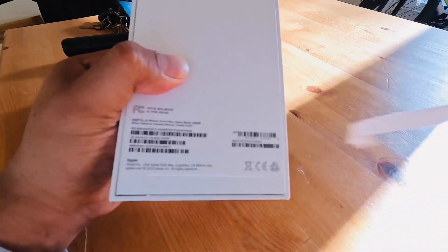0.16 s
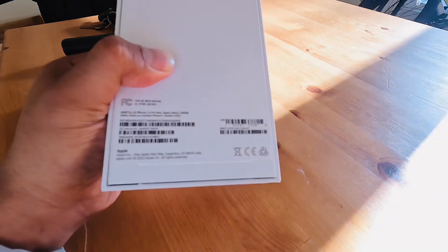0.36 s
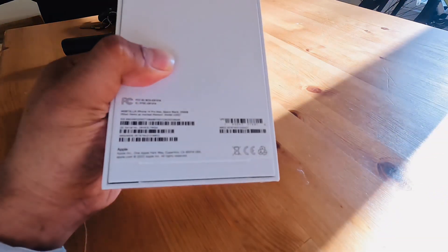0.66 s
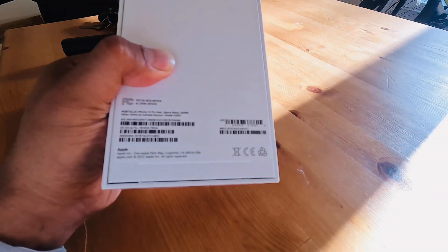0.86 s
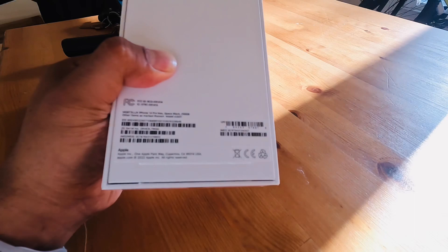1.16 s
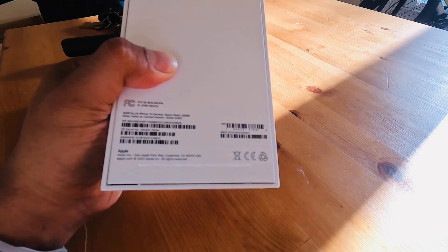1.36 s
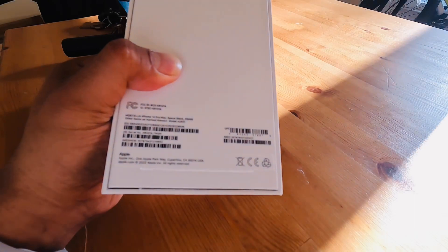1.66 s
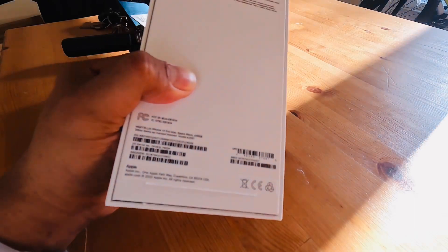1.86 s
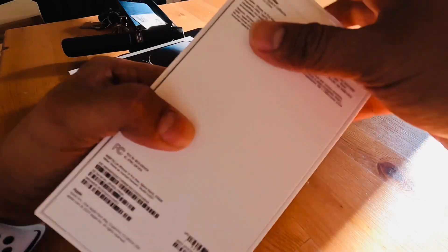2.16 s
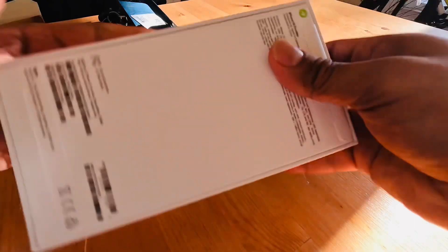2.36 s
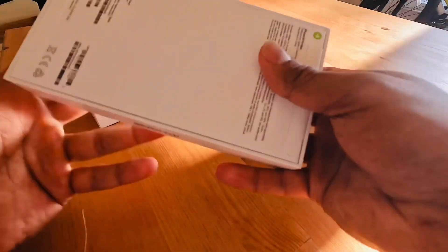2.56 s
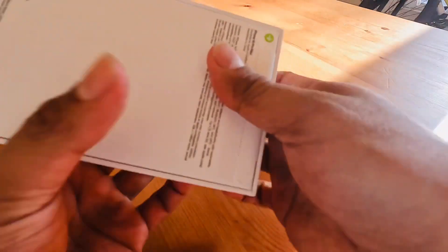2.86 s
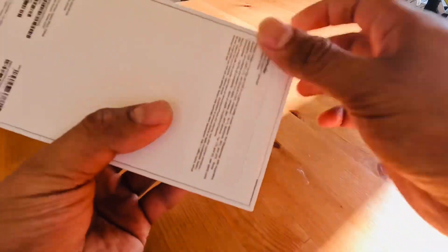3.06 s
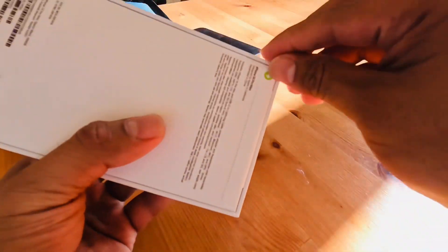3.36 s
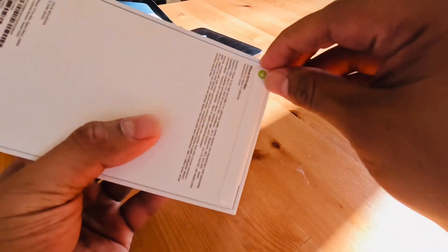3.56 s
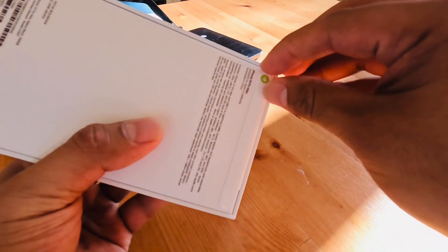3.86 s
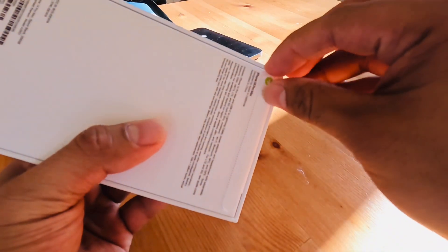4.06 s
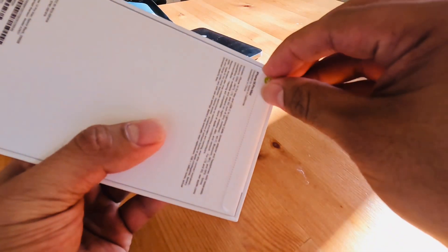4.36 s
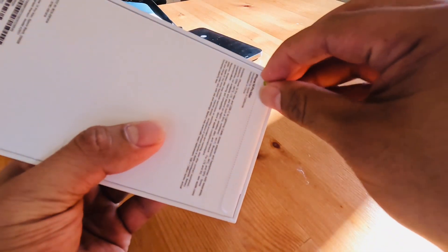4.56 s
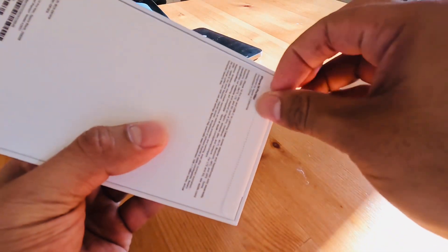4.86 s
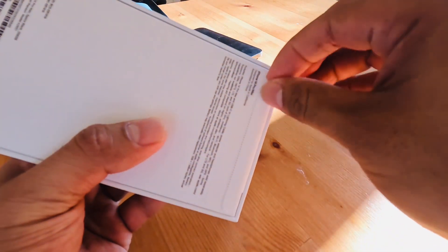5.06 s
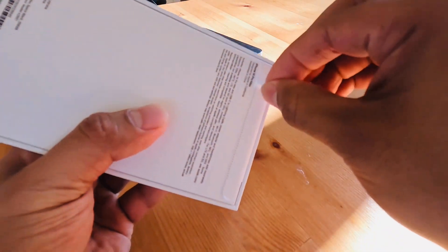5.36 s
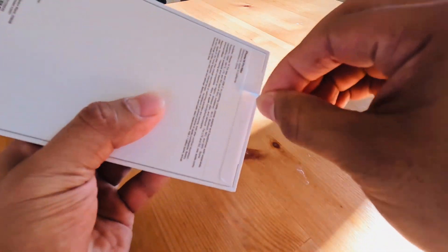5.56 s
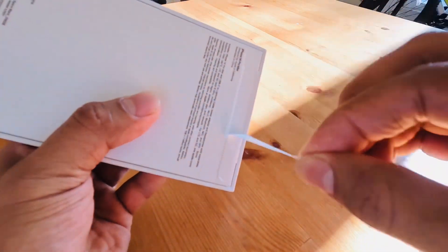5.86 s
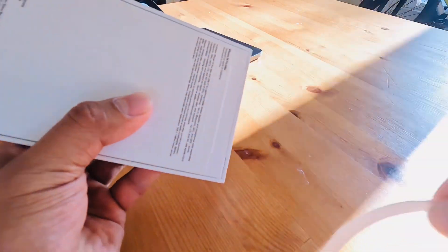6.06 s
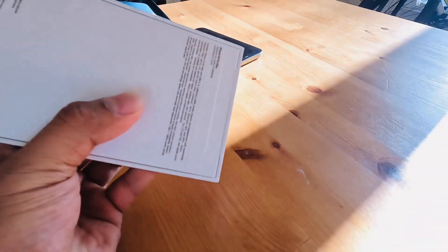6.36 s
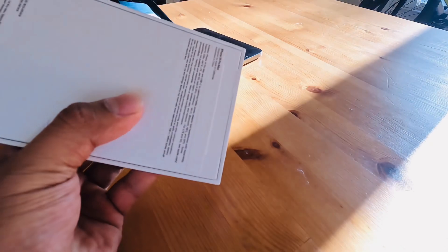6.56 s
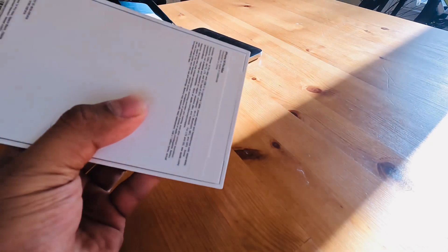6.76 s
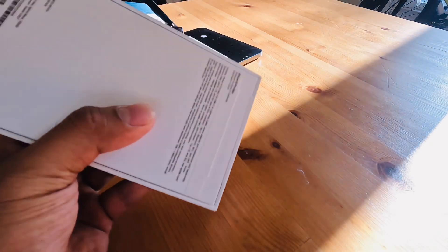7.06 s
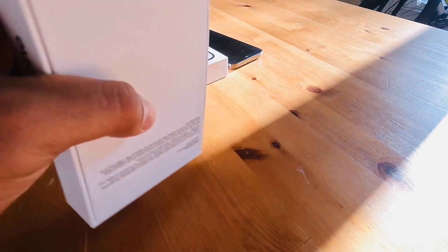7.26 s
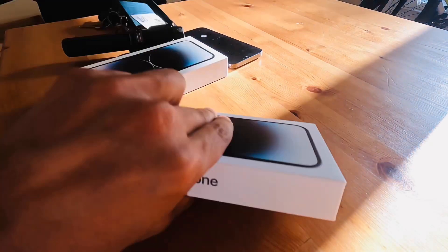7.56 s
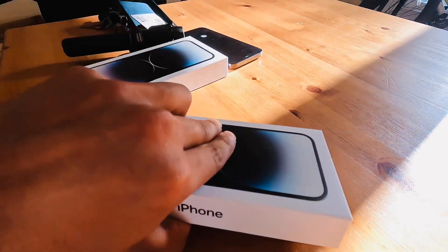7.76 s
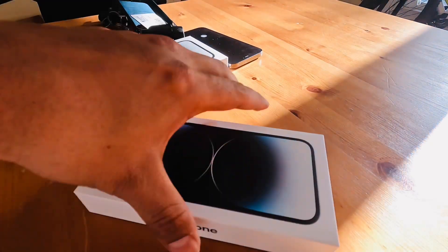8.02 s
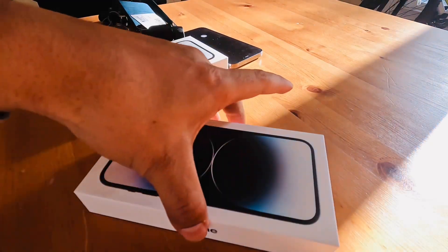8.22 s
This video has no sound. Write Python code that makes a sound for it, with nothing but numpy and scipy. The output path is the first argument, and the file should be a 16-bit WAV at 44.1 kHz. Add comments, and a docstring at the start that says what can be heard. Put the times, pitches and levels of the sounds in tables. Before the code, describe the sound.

Close raspy paper tearing at the start and again later, between handling rustles and low wooden bumps, ending with the box knocked down on a table.

```python
"""Two paper seal strips are ripped off a small cardboard box: noisy, sticking and slipping breaks with an echo.
Hands turn the box above a wooden table; sliding skin rustles and picked card snaps in short noise bursts.
Elbows and wrists bump the table, and the box is set down in two knocks: dying tones of the table top.
Behind this the camera stand sways as a slow wavering tone, the table murmurs, and a quiet room
hisses, hums and answers with a fading noise tail."""
import sys
import numpy as np
from scipy import signal
from scipy.fft import rfft, irfft, next_fast_len
from scipy.io import wavfile
from scipy.ndimage import uniform_filter1d, map_coordinates

SR = 44100
rng = np.random.default_rng(int(sys.argv[2]) if len(sys.argv) > 2 else 0)


def output_pcm(signal):
    """Save a mono or channel-first signal as 16-bit PCM at the path in sys.argv[1].

    Samples are clipped to [-1, 1] before scaling.
    """
    pcm = np.clip(np.atleast_2d(signal).T, -1, 1) * 32767
    wavfile.write(sys.argv[1], SR, np.round(pcm).astype(np.int16))


N = 369999

# Sway of the stand and murmur of the table over time: time_s, sway_db, murmur_db
SWAY = [(0.0, -39, -46), (0.26, -34, -43.5), (0.55, -28.5, -50), (0.93, -31, -60.5), (1.56, -39, -59),
        (1.85, -46.5, -61), (2.01, -37, -33), (2.41, -26.5, -53), (2.78, -30, -50), (3.25, -27, -50),
        (3.79, -43, -59), (4.58, -46, -60.5), (5.4, -44, -58.5), (5.75, -37.5, -46.5), (6.3, -36, -47),
        (6.5, -35, -63.5), (6.95, -32.5, -58.5), (7.2, -42, -48), (7.52, -43, -56.5), (7.83, -45, -31.5),
        (8.39, -55, -48)]
# The stand lurches when the table is pushed: start_s, sway_db, murmur_db
LURCHES = [(1.998, -20, -43), (2.31, -24, -41), (7.719, -26, -26.5), (8.05, -60, -37)]
LURCH_RISE_S, LURCH_HOLD_S, LURCH_T60_S = 0.024, 0.023, 0.32
# Colour of the shaking stand: pitch_hz, gain_db
STAND_COLOUR = [(7.1, -8.5), (12, -9), (27, 4), (36, -6), (46, -25.5), (57, -37), (60, -34.5), (70, -15.5),
                (91, -72), (150, -120)]
# Colour of the table's murmur: pitch_hz, gain_db
MURMUR_COLOUR = [(29, -55), (50, 0), (60, -18), (113, -11.5), (156, -23), (253, -22.5), (323, -29),
                 (399, -31), (440, -36), (700, -44), (910, -79), (1540, -120)]
# Colour of the room's hiss: pitch_hz, gain_db
AIR_COLOUR = [(240, -17), (400, -5), (694, -5.5), (1320, 0), (2150, -9.5), (7550, -9.5), (10300, -37),
              (12500, -29), (15500, -58.5)]
AIR_DB = -75
# Steady low tones of the building: pitch_hz, level_db (before a fixed lift)
HUM = [(37.7, -48)]
# How long the room's answer takes to fall by 60 dB: pitch_hz, t60_s
ROOM = [(150, 0.6), (1000, 0.43), (4000, 0.19), (12000, 0.096)]
# How far the two channels part in the treble: pitch_hz, side_factor (times)
TREBLE_WIDE = [(500, 2.72), (6000, 0.26), (9000, 0.77), (13000, 2.2)]
# The microphone falls off at the top: pitch_hz, gain_db
MIC = [(11000, -0.5), (13500, -6), (15700, -20)]
TOP_HZ = 15700

# Ringing tones of the table top: pitch_hz, level_db (relative), t60_s (before the arms damp it)
TABLE = [(31.3, 11.5, 0.17), (43.3, -2.5, 0.24), (73, 8.5, 0.14), (105.1, 4, 0.12), (162, 10.5, 0.037),
         (155, -4.5, 0.095), (208.5, -5, 0.19), (251.7, -3.5, 0.18), (269.6, -11.5, 0.36), (345, 7, 0.13),
         (378.8, -3.5, 0.34), (422, -1.5, 0.3), (530, -1.5, 0.088), (621.4, -7, 0.11), (690, 1, 0.06),
         (749, -7, 0.061), (958, -4.5, 0.072), (1188, -4, 0.05), (1325, -13.5, 0.078)]
# Bumps on the table: start_s, level_db (before a trim of the ring), deep_db, hard_db, knock_db (all three
# relative to the level), main_tone_db, main_tone_t60_s
BUMPS = [(0.031, -39, -16, -41, -27, -42, 0.3), (0.204, -29.5, 0, -14, -14.5, -38, 0.58),
         (0.279, -27.5, 3, -15, -16, -62, 0.33), (0.515, -27, -20, -45, -39, -41, 0.43),
         (0.547, -32, 10.5, -41, -36, -40.5, 0.27), (0.95, -42.5, -12, -25, -42, -65, 0.46),
         (1.839, -20, -17, -12.5, -36, -37, 0.35), (1.869, -12.5, -12, -20, -23, -33, 0.22),
         (1.906, -26.5, 12, -31, -8.5, -32, 0.18), (1.96, -23, -7, -14.5, -20, -38, 0.34),
         (2.024, -14.5, -9, -27, -27, -28, 0.26), (2.166, -5, -10, -19.5, -19, -24, .15),
         (2.228, -40, -15, -22, -24, -27.5, 0.28), (2.305, -16, -4.5, -15, -11.5, -22.5, 0.24),
         (2.472, -13.5, -10, -22.5, -31, -19.5, .2), (2.509, -21, -12, -30, -24, -32, 0.16),
         (2.716, -26.5, -41, -46, -19, -36, .17), (2.979, -28.5, -17, -27, -7, -39, .3),
         (3.04, -21, -10, -6, -0.5, -30.5, 0.2), (3.269, -26, -28, -57, -45, -29.5, 0.31),
         (4.502, -41, 3.5, -8.5, -9, -54, 0.21), (5.346, -45.5, -11, -5, -3, -63, 0.27),
         (5.489, -33, 6.5, -35, -7, -35.5, 0.35), (5.781, -31, 9.5, -26, -18, -32.5, 0.25),
         (6.043, -28, -15, -28, -12, -51, 0.6), (6.249, -35, 12, -38, -25, -32, 0.27),
         (6.278, -45, -22, -39, -40, -45, 0.23), (6.64, -46, -6, -33, -30, -50.5, .15),
         (6.97, -33.5, -14, -18.5, -17, -48, 0.68), (7.089, -30.5, -7, -31, -22, -44.5, 0.34),
         (7.19, -34, -17, -9.5, -11, -41, 0.24), (7.234, -34, -15, -36, -36, -34.5, .15),
         (7.596, -22.5, -22, -9.5, -4.5, -43, 0.34), (7.609, -5, -11, -17.5, -16, -29, 0.61),
         (7.749, -23.5, 5, -10, -26, -26.5, 0.37), (7.795, -36, 1, -15, -26, -38, 0.24),
         (7.961, -6, -12, -9, -6.5, -33, 2), (8.001, -21, -22, 2.5, -14.5, -25.5, 1.2)]
SOFT_TILT = 0.28  # share of the hard part's gain in dB that already reaches 290 Hz
PUSH_DB, PUSH_S = -9.5, 0.0018  # the blow itself, relative to the bump's level, and its time scale
ARM_DAMPING = 0.84  # the arms that stop the main tone also shorten the other tones
MAIN_HZ, MAIN_REST_DB = 126.3, -73
MAIN_RISE_S, MAIN_HOLD_S = 0.025, 0.018

# Snaps of paper, nail and card: start_s, level_db (before a trim), centre_hz, low_db and bright_db
# (relative to the level), t60_s
SNAPS = [(0.2116, -23, 3400, 1.5, -1, 0.018), (0.2184, -21, 2280, -43, -46, 0.012),
         (0.2321, -18.5, 6040, -38, -27, 0.01), (0.2918, -34, 3740, -4, -32, 0.016),
         (0.3195, -43, 5170, -1, -18, 0.012), (1.2421, -51.5, 1960, 0, -3, 0.02),
         (1.8759, -50, 2050, 18.5, -24, 0.038), (1.9906, -34, 2470, -29, -24, 0.013),
         (2.0863, -27.5, 3570, -2, -28.5, 0.0097), (2.0918, -42.5, 2050, 17.5, -24, 0.013),
         (2.138, -23, 2400, 0.5, -48, 0.0074), (2.167, -45.5, 2030, 18, -19, 0.053),
         (2.2354, -42, 1920, 8.5, -24, 0.014), (2.3096, -44.5, 2440, 14, -20, 0.026),
         (2.481, -54, 1960, 20.5, -18, 0.014), (2.712, -35, 2140, -8, -29, 0.037),
         (2.7493, -36, 3840, -15, -21, 0.036), (2.9446, -37, 3960, -6, -22, 0.006),
         (2.9815, -27.5, 4050, 3, -18, 0.011), (3.042, -48, 4710, 15.5, -9, 0.0096),
         (3.3978, -43, 2740, -23, -21, 0.031), (3.6001, -39.5, 2500, -23, -28, 0.015),
         (3.6345, -35, 2500, -38, -25, 0.0077), (4.181, -49, 2670, -6, -7.5, 0.11),
         (4.5055, -32.5, 6740, -43, -18, 0.014), (4.8612, -35.5, 6400, -13, -14, 0.0096),
         (4.9771, -33, 2340, 2, -33, 0.0097), (4.9836, -27.5, 6100, -12, -34, 0.0084),
         (5.3535, -23.5, 4020, -6.5, -9.5, 0.0073), (5.4201, -51, 4190, -14, 0, 0.01),
         (5.458, -33.5, 4120, 1, 3, 0.017), (5.4947, -26, 7450, -13, -15, 0.0094),
         (5.5438, -23, 2850, -9, -17, 0.024), (5.67, -22.5, 4870, -49.5, -25, 0.0095),
         (5.8124, -34, 2940, 3, 1.5, 0.014), (5.883, -25, 5950, -1.5, -3, 0.015),
         (5.9456, -22, 1930, -1.5, -24, 0.0084), (5.9885, -22, 5960, -13, -23, 0.016),
         (6.0443, -12, 5650, -4.5, -20, 0.011), (6.0589, -26, 2680, 1, -4, 0.014),
         (6.948, -46.5, 4170, -66, -51, 0.03), (7.026, -37, 2280, -17, -15, 0.023),
         (7.1254, -42, 4420, -21.5, -19, 0.014), (7.5603, -50.5, 3220, 14.5, -17.5, 0.016),
         (7.6112, -13.5, 3210, 15, -29.5, 0.011), (7.765, -50.5, 2030, 24.5, -34, 0.016),
         (7.831, -52.5, 1900, 24.5, -31, 0.008), (7.9643, -32.5, 2200, 23.5, -22, 0.0039)]
# The box moves about: time_s, left_minus_right_db
SNAP_PAN = [(0, -4), (5, -3), (7.5, -4)]

# Colour of rustling card: pitch_hz, gain_db
RUSTLE_COLOUR = [(880, -21), (1500, -1), (1840, -7), (2060, -2.5), (3890, -1), (4520, 0.5), (7300, -8.5),
                 (9000, -43), (11700, -43.5), (19800, -120)]
# Colour of the fine hiss in sliding and tearing: pitch_hz, gain_db
FINE_COLOUR = [(4410, -27.5), (7500, -7), (12500, -14.5), (14300, -14.5), (14700, -22), (15500, -54)]
# Colour of the dull scuff: pitch_hz, gain_db
SCUFF_COLOUR = [(260, -18), (450, -3), (595, -11), (834, -13), (1100, -8), (1840, -13.5), (2570, -19),
                (4500, -37.5), (5850, -63), (9900, -120)]
# Hands and sleeves on the move: time_s, rustle_db
HANDLING = [(0.2, -58), (0.27, -53.5), (0.7, -61), (0.8, -78), (0.93, -78.5), (1.05, -70.5), (1.33, -69.5),
            (1.45, -76), (1.6, -69.5), (1.82, -56.5), (2.5, -57.5), (3.14, -60), (3.34, -65.5),
            (3.77, -71.5), (3.9, -89), (4.3, -101), (4.9, -72.5), (5.3, -80), (6.0, -71), (6.06, -54),
            (6.4, -61.5), (7.02, -71), (7.3, -55.5), (7.9, -63), (8.21, -64), (8.3, -79.5), (8.39, -84.5)]
# Levels at a rustle of -60 dB, and dB gained per dB of rustle
FINE_DB, FINE_GROWS, SCUFF_DB, SCUFF_GROWS = -71, 0.6, -79, 0.9
# Single strokes of skin or card, and (at 7.656 and 7.942 s) a dull rattle dying after the hard knocks: start_s,
# length_s (rise and hold), fade_t60_s, rustle_db, fine_db, scuff_db
STROKES = [(0.226, 0.052, .4, -66, -65, -63.5), (1.865, 0.18, 0.39, -56, -66.5, -81),
           (2.006, 0.17, .3, -70, -68, -62), (2.173, .15, 0.2, -51.5, -57, -72),
           (2.747, 0.1, 0.9, -55, -60, -68), (2.995, 0.11, 0.089, -56, -57.5, -60),
           (4.653, 0.098, 0.31, -68, -72, -72), (4.829, 0.027, 0.11, -72, -63.5, -67),
           (5.326, 0.11, 0.13, -61.5, -64.5, -79), (6.084, .1, 0.32, -74, -65, -60),
           (6.958, 0.057, 0.9, -61, -75, -67), (7.114, 0.091, .1, -54, -58.5, -81),
           (7.384, 0.22, .3, -64, -68.5, -73), (7.656, 0.14, .5, -58.5, -87, -43.5),
           (7.942, 0.032, 0.42, -74, -78, -36.5)]
STROKE_RISE_S = 0.037
# A fingertip drags on the hollow card; the width is that of one of two equal filters
PUFF_S, PUFF_RISE_S, PUFF_HOLD_S, PUFF_T60_S = 4.66, 0.05, 0.03, 0.08
PUFF_DB, PUFF_HZ, PUFF_WIDTH_HZ = -59, 1280, 630

# Two tearing strips, each with rows of: time_s, level_db, box_db (relative, before a trim), second_echo_band_hz
TEARS = [
    [(0.0, -51.5, -3.5, 5940), (0.08, -49.5, 1, 5000), (0.2, -52.5, -2.5, 5580), (0.214, -45, -3, 5640),
     (0.23, -59, -12, 5670)],
    [(5.46, -51, -5, 5150), (5.516, -41.5, -1.5, 5270), (5.596, -46.5, -1, 5430), (5.648, -43, 3.5, 5200),
     (5.742, -45.5, 4, 5120), (5.918, -44, 5, 5420), (6.04, -43.5, 0, 5960), (6.08, -50, 9.5, 5670)],
]
# Fine hiss of each tear: bright_db (relative to the tear's level)
TEAR_BRIGHT_DB = [1.5, -9.5]
# Colour of tearing paper: pitch_hz, gain_db
STRIP_COLOUR = [(880, -28), (1500, -0.5), (2220, -8.5), (2490, -9), (2780, -4.5), (3800, 0.5), (5190, -3),
                (6370, -0.5), (7670, -9), (13000, -19), (15500, -41)]
# Colour of the box walls under the tear: pitch_hz, gain_db
BOX_COLOUR = [(88, -44), (150, -6), (192, -16), (346, -3.5), (588, -11), (1000, -4), (1460, -16.5),
              (2000, -13), (2600, -17), (4400, -120)]
TEAR_PAN_DB = -0.8  # left minus right
SLIPS_PER_S, SLIP_S, SLIP_SPREAD_DB, SLIP_BED = 340, 0.00079, 6.5, 1  # the strip sticks and slips
ECHO = 0.68  # share of the echo kept on each trip


def amp(db):
    """Turn decibels into a gain."""
    return 10 ** (np.asarray(db) / 20)


def unit(x):
    """Scale a sound to an average (rms) strength of 1."""
    return x / np.sqrt(np.mean(x ** 2) + 1e-20)


def along(points, hz):
    """Read a value between (pitch, value) points on a log pitch axis."""
    f, v = np.transpose(points)
    return np.interp(np.log(hz + 1), np.log(f + 1), v)


def curves(rows):
    """One value per sample for each column, and a gate that is open while the table lasts."""
    s, *cols = np.transpose(rows)
    t = np.arange(N) / SR
    gate = uniform_filter1d(1. * ((t >= s[0]) & (t <= s[-1])), size=400)
    return gate, [np.interp(t, s, c) for c in cols]


def wobble(rate):
    """A smooth random curve with `rate` random points a second."""
    points = rng.standard_normal(int(N * rate / SR) + 4)
    return map_coordinates(points, [np.arange(N) * rate / SR])


def filtered(x, response):
    """Change the strength of each pitch in x by a response."""
    m = next_fast_len(N + SR // 2)
    return irfft(rfft(x, m) * response(np.fft.rfftfreq(m, 1 / SR)), m)[..., :N]


def sides(pan_db):
    """Left and right gains that differ by pan_db."""
    return amp(np.array([pan_db / 2, -pan_db / 2]))


def panned(x, pan_db):
    """Place a mono or stereo sound between left and right."""
    return x * sides(np.full(1, pan_db))


def swell(s, rise, hold, t60):
    """Gain that rises from time s, holds, then dies away."""
    t = np.arange(N) / SR - s
    rise, hold = max(rise, .002), max(hold, 0)
    fade_time = np.clip(t - rise - hold, 0, None)
    return np.clip(t / rise, 0, 1) * amp(-60 * fade_time / max(t60, .02))


def together(gains):
    """Unrelated pushes add in power."""
    return np.sqrt(sum(np.square(g) for g in gains))


def grains(per_s, spread_db, bed):
    """Irregular tiny breaks of very uneven size on a bed of noise."""
    hit = rng.random(N) < per_s / SR
    size = amp(spread_db * np.minimum(rng.exponential(size=N), 3)) * rng.standard_normal(N)
    return unit(unit(hit * size) + bed * rng.standard_normal(N))


def coloured(x, spectrum, wide):
    """Stereo sound of rms 1; wide sets the part that differs between channels, more or less in the treble."""
    other = x * rng.standard_normal(N)

    def response(hz):
        return amp(along(spectrum, hz)) * [hz * 0 + 1, along(TREBLE_WIDE, hz)]

    mid, side = filtered(np.array([x, wide * other]), response)
    return unit(np.array([mid + side, mid - side]))


def background():
    """The stand sways slowly, the table murmurs under resting arms, the room hisses faintly."""
    lurches = [np.outer(amp(dbs), swell(s, LURCH_RISE_S, LURCH_HOLD_S, LURCH_T60_S))
               for s, *dbs in LURCHES]
    sway_gain, murmur_gain = together([amp(curves(SWAY)[1])] + lurches)
    # a nearly regular rocking around 22.5 Hz
    swing = np.sin(2 * np.pi * np.cumsum(22.5 + 0.805 * wobble(4.7)) / SR)
    shake = coloured(rng.standard_normal(N), STAND_COLOUR, wide=0.18)
    sway = panned(sway_gain * (1.033 * swing + 0.16 * shake), -4.5)
    lumps = rng.standard_normal(N) * amp(2.2 * wobble(22))
    murmur = panned(murmur_gain * coloured(lumps, MURMUR_COLOUR, wide=0.13), -1.5)
    air = amp(AIR_DB) * coloured(rng.standard_normal(N), AIR_COLOUR, wide=0.59)
    return sway + murmur + air


def hum():
    """Low tones of the building waver a little in strength and timing."""
    t = np.arange(N) / SR
    tones = 0
    for hz, db in HUM:
        level = amp(db + 2.5 + 1.6 * wobble(1.1))
        tones = tones + level * np.sin(2 * np.pi * hz * t + 0.48 * wobble(1.7))
    return panned(tones, -3.5)


def room(x):
    """Each pitch of the room's answer dies at its own speed."""
    hz, t, z = signal.stft(rng.standard_normal((2, SR // 2)), SR, nperseg=256)
    z = z[0] + 0.3 * z[1] * np.array([1, -1])[:, None, None]  # the second noise parts left from right
    fade = amp(-60 * t / along(ROOM, hz)[:, None])
    tail = signal.istft(z * fade, SR, nperseg=256)[1]
    late = np.pad(x, (300, 0))[None]  # the answer starts 300 samples later
    return signal.fftconvolve(late, tail / np.linalg.norm(tail[0]), axes=1)[:, :N]


def main_ring():
    """One slightly unsteady tone of the table top: each bump swells it, resting arms stop it sooner or later."""
    swells = [amp(db) * swell(s, MAIN_RISE_S, MAIN_HOLD_S, t60) for s, *_, db, t60 in BUMPS]
    gain = together([amp(MAIN_REST_DB)] + swells)
    phase = 2 * np.pi * MAIN_HZ * np.arange(N) / SR + .5 * wobble(3)
    return panned(gain * np.sin(phase), -1.8)


def bumps():
    """Each bump rings the table's tones at new strengths; soft flesh drives the deep ones, hard card the high ones."""
    out, t = np.zeros((2, N + SR)), np.arange(SR // 2) / SR
    hz, level, t60 = np.transpose(TABLE)[:, :, None]
    u = t / PUSH_S
    push = sides(np.full(1, -2.2)) * u ** 2 * (1 - u / 3) * np.exp(1.5 - u)
    lean = sides(along([(50, -8), (130, -2.5), (400, -2.5)], hz[:, 0]))  # left-right balance of each tone
    build = 1 - np.exp(-t * hz / 0.64)  # the contact builds over part of a cycle
    for s, db, deep_db, hard_db, knock_db, _, main_t60 in BUMPS:
        luck_db = 2 * rng.standard_normal((len(TABLE), 1))
        detune = 1 + .02 * rng.standard_normal((len(TABLE), 1))
        contact_db = along([(75, deep_db), (95, 0), (110, 0), (290, SOFT_TILT * hard_db),
                            (330, hard_db), (450, hard_db), (520, knock_db)], hz)
        # loose card roughens the high tones
        drift = np.cumsum(rng.standard_normal((len(TABLE), len(t))), axis=1)
        blur = (.00004 * hz + .009 * (hz > 190)) * drift
        fade_db = -60 * t * (1 / t60 + ARM_DAMPING / max(main_t60, .05))
        ring = amp(level + contact_db + luck_db + fade_db) * build
        ring = ring * np.sin(2 * np.pi * hz * detune * t + blur)
        one = -amp(db - 5.0) * (lean @ ring) - amp(db + PUSH_DB) * push
        out[:, round(s * SR):][:, :len(t)] += one
    return out[:, :N]


def snaps():
    """Each snap is a short dying burst: a crack ringing near its centre, a lower tock of card, a bright tick."""
    out, t = np.zeros((2, N + SR)), np.arange(4096) / SR
    f = np.fft.rfftfreq(len(t), 1 / SR)

    def band(centre, width):
        return 1j * f * width / (centre * centre - f * f + 1j * f * width)

    def peak(burst, response):
        x = irfft(burst * response)
        return x / abs(x).max()

    for s, db, hz, low_db, high_db, t60 in SNAPS:
        shape = amp(-60 * t / max(t60, .002)) * (1 - np.exp(-t / 0.00011))
        burst = rfft(shape * rng.standard_normal(len(t)))
        crack = peak(burst, (0.18 * band(2900, 4000) + band(hz, 0.31 * hz)) * band(1700, 7000) ** 2)
        tock = amp(low_db) * peak(burst, band(1153, 1400) ** 2)
        tick = amp(high_db) * peak(burst, band(9300, 4500) ** 3)
        box_sides = sides(np.interp(s, *np.transpose(SNAP_PAN)))
        one = np.outer(box_sides, crack + tock) + np.outer(sides(1.48), tick)
        out[:, round(s * SR):][:, :len(t)] += amp(db - 2.0) * one
    return out[:, :N]


def puff():
    """A fingertip dragging on hollow card is a short mid-band rub of noise."""
    def band(f):
        return (1j * f * PUFF_WIDTH_HZ / (PUFF_HZ ** 2 - f * f + 1j * f * PUFF_WIDTH_HZ)) ** 2

    noise = unit(filtered(rng.standard_normal(N), band))
    return panned(amp(PUFF_DB) * swell(PUFF_S, PUFF_RISE_S, PUFF_HOLD_S, PUFF_T60_S) * noise, -2.0)


def sliding():
    """Skin on card rustles with slight grain; quick strokes add fine hiss, pressed ones a dull scuff, and a
    dull rattle dies away after the hard knocks near the end."""
    rub = grains(per_s=2800, spread_db=4, bed=1.6) * amp(1.2 * wobble(25))
    rustle = coloured(rub, RUSTLE_COLOUR, wide=0.38)
    fine = coloured(rub, FINE_COLOUR, wide=0.4)
    scuff = coloured(rub, SCUFF_COLOUR, wide=0.24)
    gate, (db,) = curves(HANDLING)
    over = db + 60
    moving = gate * amp([db, FINE_DB + FINE_GROWS * over, SCUFF_DB + SCUFF_GROWS * over])
    strokes = [np.outer(amp(dbs), swell(s, STROKE_RISE_S, length - STROKE_RISE_S, t60))
               for s, length, t60, *dbs in STROKES]
    gains = together([moving] + strokes)
    return panned(sum(g * x for g, x in zip(gains, (rustle, fine, scuff))), -1.5)


def slips():
    """Uneven lurches of the tear line, each a quick burst that dies away."""
    gaps = np.clip(1 + .35 * rng.standard_normal(4000), .2, 3)
    times = np.cumsum(gaps) / SLIPS_PER_S
    size = amp(SLIP_SPREAD_DB * rng.standard_normal(4000))
    kicks = np.bincount((times * SR).astype(int), size, minlength=N)[:N]
    return SLIP_BED + np.convolve(kicks, np.exp(-np.arange(400) / SR / SLIP_S))[:N]


def tearing():
    """Fibres and glue let go in a dense rasp; a short echo off the lifted strip draws bands that move with the pull."""
    breaks = grains(per_s=3000, spread_db=0.7, bed=0.62) * amp(0.5 * wobble(30)) * slips()
    fine = coloured(breaks, FINE_COLOUR, wide=0.14)
    paper = coloured(breaks, STRIP_COLOUR, wide=0.29)
    walls = coloured(breaks, BOX_COLOUR, wide=0.084)
    dulled = uniform_filter1d(paper, size=3, axis=1)  # the echo loses its top
    out, n = 0, np.arange(N)
    for rows, bright_db in zip(TEARS, TEAR_BRIGHT_DB):
        gate, (db, box_db, second_hz) = curves(rows)
        second_hz = second_hz * (1 + .022 * wobble(30))
        banded = paper
        for trips in range(1, 7):
            heard_from = n - 2 * trips * SR / second_hz  # the earlier sample that returns now
            echo = np.array([map_coordinates(c, [heard_from], order=1) for c in dulled])
            banded = banded + 1.2 * ECHO ** trips * echo
        rip = amp(-0.5) * banded + amp(bright_db) * fine + amp(box_db - 4.0) * walls
        out = out + panned(gate * amp(db) * rip, TEAR_PAN_DB)
    return out


def scene():
    """Add all sources; the room answers the snaps, the tears and the bumps."""
    near = snaps() + tearing()
    low = bumps()
    answer = room(amp(-17.0) * near.mean(axis=0) + amp(-11.5) * low.mean(axis=0))
    quiet = background() + hum()
    return near + low + answer + sliding() + quiet + puff() + main_ring()


def record(dry):
    """The camera rounds off the loudest peaks, dulls the top and keeps nothing above its band limit."""
    dry = dry / (1 + abs(dry) ** 6) ** (1 / 6)
    return filtered(dry, lambda hz: amp(along(MIC, hz)) * (hz < TOP_HZ))


dry = scene()
out = record(dry)
output_pcm(out)
```